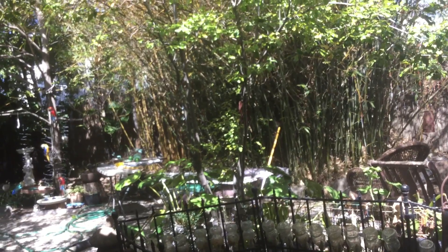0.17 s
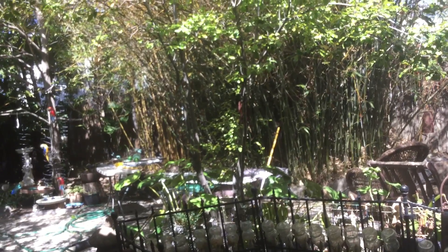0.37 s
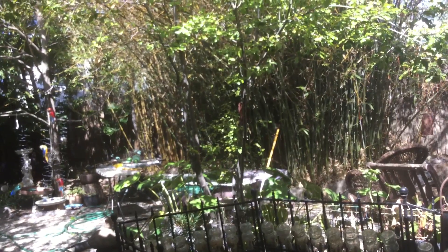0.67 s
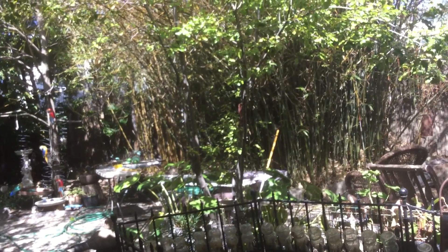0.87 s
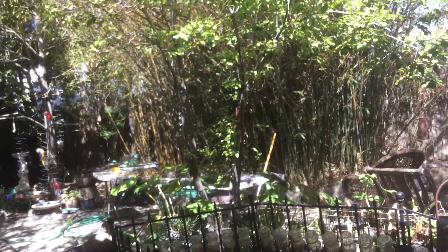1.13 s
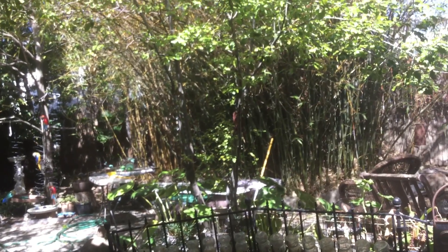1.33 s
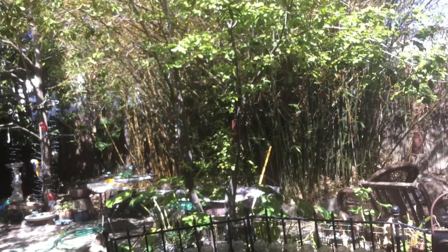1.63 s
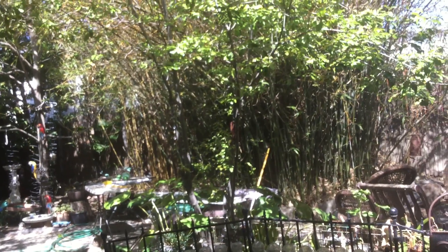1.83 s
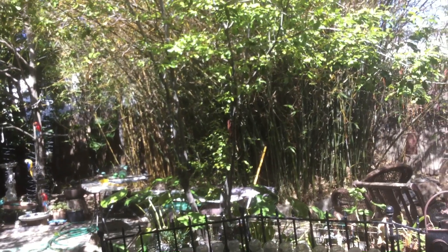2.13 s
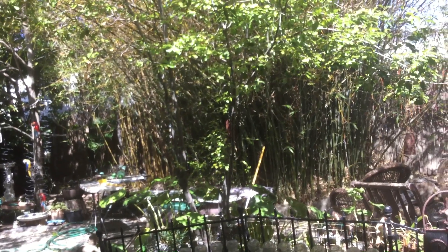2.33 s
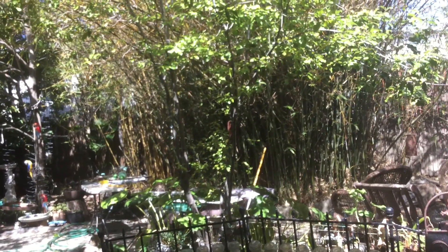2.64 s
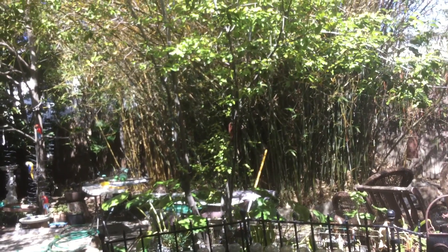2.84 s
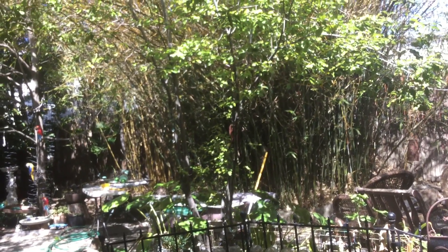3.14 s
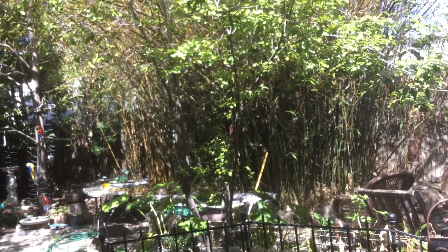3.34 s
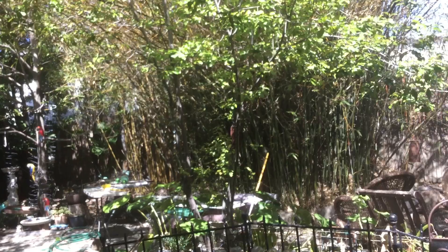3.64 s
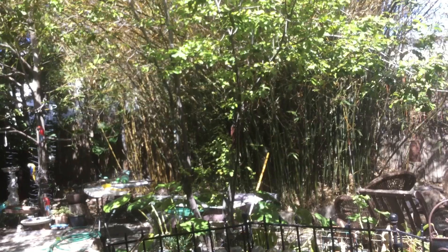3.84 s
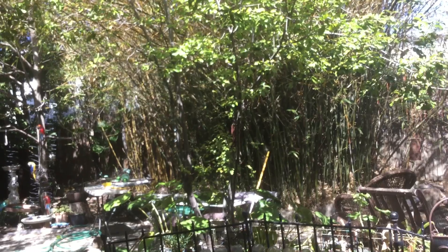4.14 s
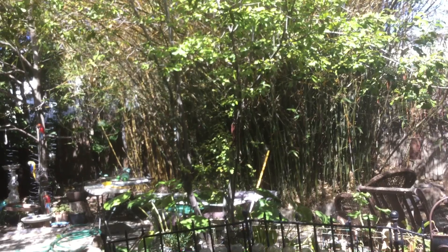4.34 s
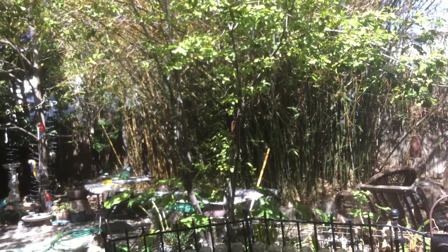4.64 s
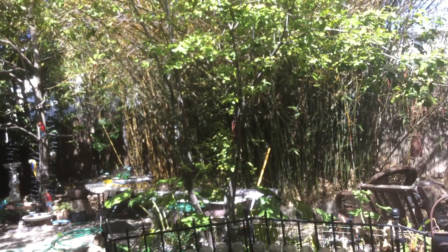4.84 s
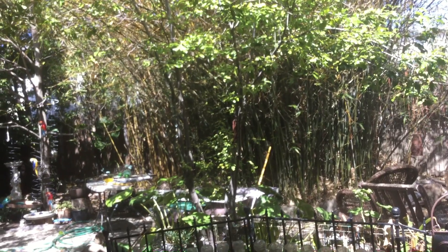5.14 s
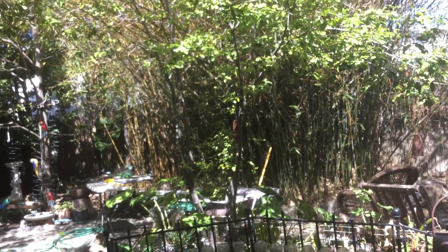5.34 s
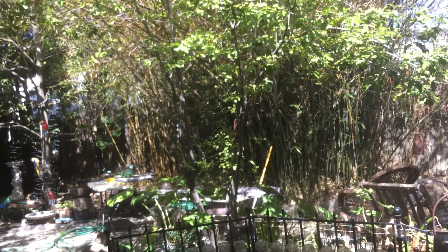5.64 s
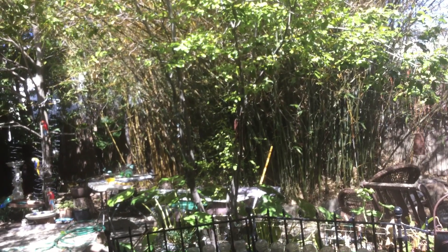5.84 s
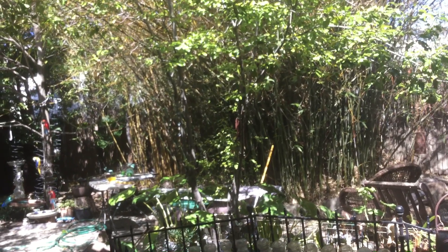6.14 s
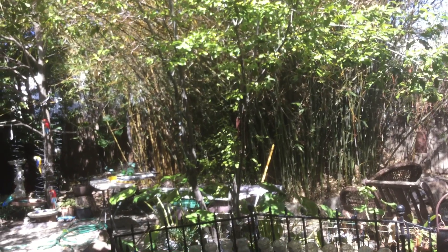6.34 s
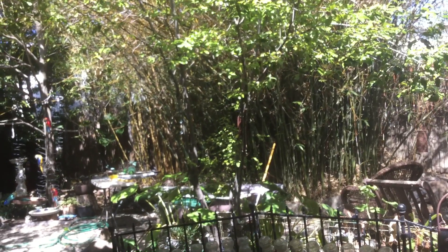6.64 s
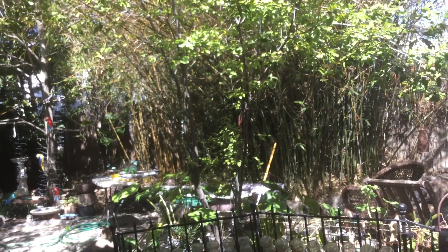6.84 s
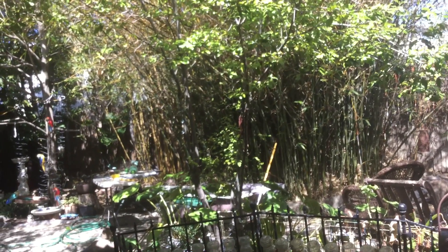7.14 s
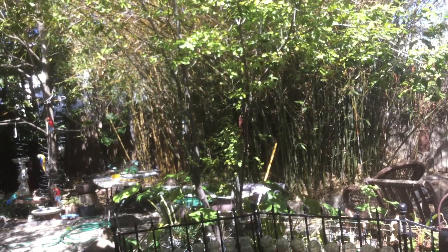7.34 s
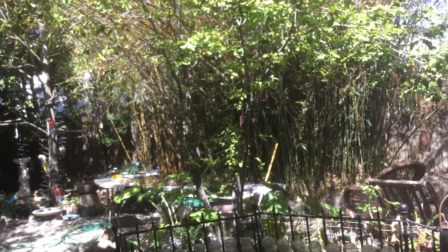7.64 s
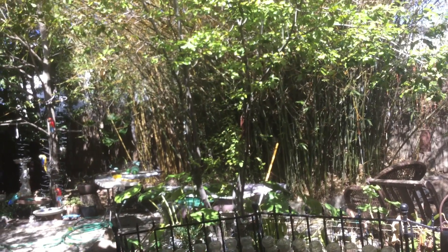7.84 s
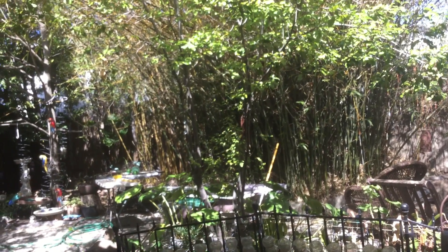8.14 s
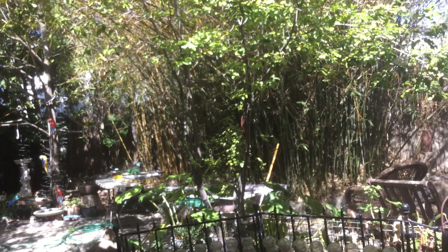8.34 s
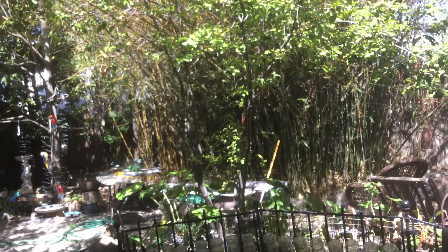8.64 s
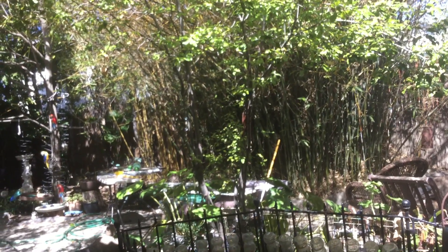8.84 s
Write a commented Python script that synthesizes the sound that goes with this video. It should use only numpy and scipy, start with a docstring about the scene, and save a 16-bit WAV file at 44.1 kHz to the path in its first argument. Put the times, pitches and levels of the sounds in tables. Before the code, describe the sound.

Several sparrows sing over each other in a garden thicket. A near bird gives clear whistles, downward slurs and even insect-like buzzes, strongest around 1.5 to 3 seconds and again from 7 to 8.5. Sharp chips, chirrups and loose warbles fill the gaps, while farther birds blur into short echoes. Very faint dove coos sit beneath early on, with soft traffic rumble and light hiss. One fixed outdoor microphone.

```python
"""Sparrows in a garden thicket

Several sparrows sing over each other: whistles and slurs are near-sines gliding along pitch
curves, buzzes and warbles are trains of pitch sweeps, with short chips between them.
Sparse echoes off fences and stems blur the farther birds. Underneath lie distant chatter,
a faint dove of pure coos, and shaped noise for far traffic rumble, hum and microphone hiss."""
import sys
import numpy as np
from scipy import signal
from scipy.fft import rfft, irfft
from scipy.io import wavfile
from scipy.ndimage import uniform_filter1d

SR = 44100
rng = np.random.default_rng(int(sys.argv[2]) if len(sys.argv) > 2 else 0)


def natural_amplitude(level_db):
    """Convert a level in decibels to a linear amplitude factor, elementwise."""
    exponent = np.asarray(level_db, float) / 20
    return 10 ** exponent


def unload_wav(signal):
    """Save mono or channel-first audio to the path in sys.argv[1] as 16-bit WAV at rate SR, clipped to [-1, 1]."""
    wavfile.write(
        sys.argv[1],
        SR,
        np.round(np.clip(np.atleast_2d(signal).T, -1, 1) * 32767).astype(np.int16),
    )


N = 396900


def evened(x):
    """Scales to rms 1."""
    return x / np.sqrt(np.mean(x ** 2) + 1e-20)


def drift(count, size):
    """Smooth random wander of rms about 1; size in samples."""
    once = uniform_filter1d(rng.standard_normal(count), size)
    return uniform_filter1d(once, size) * np.sqrt(1.5 * size)


def curve(rows):
    """A level curve in dB as gain over the whole scene."""
    return natural_amplitude(np.interp(np.arange(N) / SR, *np.transpose(rows), left=-150, right=-150))


def add(mix, start_s, sound, echo_share):
    """Splits a sound's power between the direct path (row 0) and the echo send (row 1)."""
    echo_share = np.clip(echo_share, 0, 1)
    part = mix[:, round(start_s * SR):][:, :len(sound)]
    part += np.sqrt([[1 - echo_share], [echo_share]]) * sound[:part.shape[1]]


def unroll(rows):
    """Pitch and gain of a note sample by sample, pitch corners rounded, ends faded."""
    s, hz, db = np.transpose(rows)
    t = np.arange(s[0], s[-1], 1 / SR)
    fade = np.clip(np.minimum(t - s[0], s[-1] - t) / .008, 0, 1)
    pitch_hz = uniform_filter1d(np.interp(t, s, hz), size=250, mode="nearest")
    return pitch_hz, natural_amplitude(np.interp(t, s, db)) * fade


def syrinx(hz, overtones_db=(-45,)):
    """A sine of rms 1 that follows hz, plus overtones at the given levels."""
    phase = 2 * np.pi * (np.cumsum(hz) / SR + rng.random())
    partials = (natural_amplitude(db) * np.sin(k * phase) for k, db in enumerate((0, *overtones_db), 1))
    return np.sqrt(2) * sum(partials)


def whistle(rows, far):
    """A steady membrane; breath and stirring leaves make it tremble, more so from afar."""
    hz, gain = unroll(rows)
    tremble = natural_amplitude(4.9 * far * drift(len(hz), size=250))
    waver = 1 + 0.013 * far * drift(len(hz), size=300)
    return gain * tremble * syrinx(hz * waver)


def buzz(sweeps_per_s, span_hz, rows):
    """A train of sweeps that linger, then slide up or down; fast ones tick evenly, slow ones wander."""
    hz, gain = unroll(rows)
    n = len(hz)
    loose = np.clip(40 / sweeps_per_s, 0, 1) ** 2
    rate = sweeps_per_s * (1 + (.035 + .3 * loose) * drift(n, size=900))
    turns = np.cumsum(rate) / SR + rng.random()
    sweep = turns % 1
    puff = np.sin(np.pi * sweep ** .8) ** 1.1  # loudest while the pitch lingers
    if 160 < sweeps_per_s < 400:
        puff *= 1 + .35 * np.sin(np.pi * turns)  # strong-weak pairs
    puff *= natural_amplitude((1.5 + 2 * loose) * drift(n, size=150))
    puff *= np.minimum(np.arange(n) / (.02 * SR), 1)
    glide = uniform_filter1d(np.sin(np.pi / 2 * sweep ** 1.5) ** 2, size=50, mode="nearest")
    slide = (1.05 - .3 * loose) * (glide - .38)
    wander = .035 * drift(n, size=120)
    wander += loose * (.2 * drift(n, size=500) + .08 * drift(n, size=70))
    return gain * evened(puff) * syrinx(hz + span_hz * (slide + wander))


def echo_share(db):
    """Fainter birds are farther and reach the ear mostly as echo."""
    near_db, share_per_db = -38, 0.036
    return np.clip(share_per_db * (near_db - db), .03, 1)


# Traffic and hiss spectrum. Each row: frequency in Hz, relative density in dB.
AIR_SPECTRUM = [(21, -53), (35, -13.5), (97, 0), (174, -11), (283, -13), (496, -25.5), (691, -23.5),
                (2180, -32.5), (4790, -35), (6190, -35.5), (7210, -30), (10000, -45.5), (14000, -42.5),
                (15500, -45.5)]
# Far engines. Each row: centre in Hz, width in Hz, level in dB.
ENGINE_DRONES = [(58.03, 1.1, -61), (80.8, 13.3, -59.5), (109.1, 12.3, -58.5)]


def air():
    """Steady noise shaped by its spectrum, swelling a little, plus narrow engine drones."""
    level_db = -57.5
    hz = np.fft.rfftfreq(N, 1 / SR)
    f, db = np.transpose(AIR_SPECTRUM)
    shape = natural_amplitude(np.interp(np.log(hz + 1), np.log(f + 1), db))
    wash = irfft(rfft(rng.standard_normal(N)) * shape, N)
    swell_db = .5 * drift(N, size=8000) + 1.05 * drift(N, size=2500)
    out = natural_amplitude(level_db + swell_db) * evened(wash)
    for centre_hz, width_hz, db in ENGINE_DRONES:
        peak = 1 / (1 + (2 * (hz - centre_hz) / width_hz) ** 2)
        out += natural_amplitude(db) * evened(irfft(rfft(rng.standard_normal(N)) * peak, N))
    return out


# Each row: start in seconds, level in dB.
DOVE_COOS = [(0, -66.5), (.36, -69.5), (.9, -69.5), (1.182, -78), (1.55, -74), (2.14, -66.5),
             (2.441, -68.5), (2.72, -69), (3.0, -67.5), (3.36, -72.5), (3.62, -73)]


def dove():
    """Soft pure coos far away: one wavering sine that rises quickly and dies away at each coo."""
    pitch_hz, rise_s, fade_db_per_s = 420, 0.021, -58.5
    t = np.arange(N) / SR
    gain = np.zeros(N)
    for s, db in DOVE_COOS:
        rise = np.clip((t - s) / rise_s, 0, 1)
        gain += rise * natural_amplitude(db + fade_db_per_s * np.maximum(t - s, 0))
    return gain * syrinx(pitch_hz * (1 + 0.00417 * drift(N, size=4000)), ())


# Each row: time in seconds, level in dB.
WING_FLUTTER = [(8.58, -84), (8.68, -58.5), (8.78, -58.5), (8.87, -75), (9, -58)]


def flutter():
    """Wing beats rustle the leaves: bright noise in quick lumps."""
    band = signal.butter(3, [3000, 8500], "band", fs=SR, output="sos")
    rustle = signal.sosfilt(band, rng.standard_normal(N))
    return curve(WING_FLUTTER) * evened(rustle * natural_amplitude(2 * drift(N, size=500)))


# Far flock. Each row: time in seconds, relative level in dB.
FLOCK_LEVEL = [(0, -100), (.4, -86), (1.4, -64.5), (2, -78), (2.3, -62.5), (2.8, -76), (3.4, -60.5),
               (4.2, -66.5), (4.7, -90), (5, -80), (5.5, -71.5), (6, -61), (6.24, -70), (6.4, -60),
               (7.2, -62), (7.7, -70.5), (8.3, -66), (8.5, -84), (8.75, -62), (9, -68)]


def chatter():
    """Many far birds: quick random falling slurs, sent only to the echo."""
    send = np.zeros((2, N))
    for when, pitch, slide, length, faint in rng.random((2500, 5)):
        hz, db = 3000 + 2900 * pitch, -6 * faint
        rows = [(0, hz, db), (.025 + .03 * length, hz * (.72 + 0.27 * slide), db)]
        add(send, when * N / SR, whistle(rows, 0.75), 1)
    return curve(FLOCK_LEVEL) * evened(send)


# Each row: start in seconds, level in dB, length in seconds, first pitch in Hz, last pitch in Hz.
NASAL_CALLS = [(1.506, -63, 0.041, 2780, 2260), (4.284, -57.5, 0.038, 2790, 2074),
               (4.347, -66.5, 0.036, 1730, 1350), (5.004, -57.5, 0.037, 2570, 2436),
               (5.263, -56.5, 0.037, 2640, 2100), (6.071, -63, 0.055, 2550, 1905),
               (6.14, -66, 0.0364, 2510, 1990), (6.717, -57.5, 0.032, 2780, 2020),
               (8.208, -60.5, 0.052, 2500, 2015), (8.665, -62, 0.032, 2750, 1930)]


def chucks():
    """Nasal falling calls: low rough slides rich in overtones."""
    for s, db, length, from_hz, to_hz in NASAL_CALLS:
        u = np.arange(0, 1, 1 / (length * SR))
        hz = (from_hz + (to_hz - from_hz) * u) * (1 + 0.045 * drift(len(u), size=60))
        yield s, natural_amplitude(db) * np.sin(np.pi * u) * syrinx(hz, (-6, -14)), .7


# Each row: start in seconds, level in dB, length in seconds, centre in Hz, pitch range in Hz.
THIN_CHIPS = [(0.037, -53.5, 0.018, 8820, 700), (1.035, -37.5, 0.011, 8310, 1230),
              (1.373, -61, 0.017, 8480, 400), (2.946, -69, 0.035, 8440, 596),
              (4.001, -64, 0.017, 8340, 1480), (4.983, -42, 0.0097, 8540, 590),
              (5.453, -43.5, 0.01, 8610, 1050), (5.932, -63, 0.016, 8440, 604)]


def tsips():
    """Thin high chips shaken rapidly across their range."""
    for s, db, length, hz, span_hz in THIN_CHIPS:
        t = np.arange(0, length, 1 / SR)
        shake = np.sin(2 * np.pi * (110 * t + rng.random()))
        window = signal.windows.tukey(len(t), .8)
        yield s, natural_amplitude(db) * window * syrinx(hz + .5 * span_hz * shake, ()), .7


# Each row: start in seconds, level in dB, length in seconds, foot in Hz, top in Hz.
ALARM_CHIPS = [(0.625, -43.5, 0.03, 3860, 5630), (2.051, -43, 0.027, 3890, 5650),
               (3.518, -43.5, 0.024, 4180, 5650), (5.198, -48, 0.047, 3640, 5464),
               (6.487, -45, 0.044, 4120, 5730)]


def chips():
    """Arched alarm chips: the pitch snaps up, sags a little, snaps down."""
    for s, db, length, foot_hz, top_hz in ALARM_CHIPS:
        u = np.arange(0, 1, 1 / (length * SR))
        arch = np.interp(u, [0, .22, .45, .8, 1], [0, 0.94, 0.99, 0.61, 0])
        hz = foot_hz + (top_hz - foot_hz) * uniform_filter1d(arch, size=90, mode="nearest")
        yield s, natural_amplitude(db) * signal.windows.tukey(len(u), .35) * syrinx(hz, (-24,)), .6


# Shape shared by one kind of bird. Each row: time in seconds, pitch in Hz, relative level in dB.
CHIRRUP_SHAPE = [(0, 3762, 15), (0.009, 4907, -9), (.022, 3995, 0.5), (.045, 3134, -16), (0.064, 3502, -5),
                 (.09, 3143, -8.5), (.125, 3255, -24)]
# Each row: start in seconds, level in dB, pitch factor.
CHIRRUP_CALLS = [(1.368, -41, 1.01), (2.957, -44.5, 0.96), (4.0, -39.5, 0.98), (5.93, -41.5, 1.01),
                 (7.393, -43, 0.96)]


def chirrups():
    """One pitch contour whistled again and again, transposed a little."""
    for s, db, factor in CHIRRUP_CALLS:
        yield s, natural_amplitude(db) * whistle(np.array(CHIRRUP_SHAPE) * [1, factor, 1], 0.56), .65


# Each row: start in seconds, length in seconds, first level in dB, first pitch in Hz, last pitch in Hz.
QUICK_SLIDES = [(.327, 0.12, -58, 4070, 3300), (4.121, 0.072, -57.5, 5220, 4930),
                (.74, 0.04, -56, 3340, 3100), (.51, .075, -55, 4300, 3900), (.575, .045, -58, 3000, 3300),
                (.68, .025, -56, 4150, 3900), (4.79, .06, -63, 3300, 2700), (4.9, .05, -64, 3150, 2750),
                (5.035, .03, -59, 2500, 3150), (4.235, .06, -59, 3150, 3400), (3.97, .03, -57, 5100, 4400),
                (4.285, .025, -59, 4200, 4900), (5.655, .03, -53, 3950, 3500),
                (5.68, .035, -58, 3200, 2900), (6.545, .045, -54, 4200, 3000),
                (6.575, .08, -60, 2600, 2300), (4.745, 0.035, -62, 4500, 3400),
                (4.863, 0.03, -53.5, 5880, 7600), (4.82, 0.1, -61, 4500, 4150),
                (5.745, 0.039, -50, 5280, 4250), (7.14, 0.085, -56.5, 3120, 2390),
                (7.684, 0.035, -54.5, 3780, 3090), (7.815, .045, -58, 3800, 2450),
                (7.9, .03, -59, 2850, 3320), (8.1, 0.05, -54, 4120, 2640), (8.19, 0.037, -54, 4250, 3500),
                (8.225, 0.059, -60.5, 3520, 3170), (8.275, 0.035, -62, 2970, 2710),
                (3.01, 0.048, -46, 3450, 3264), (3.07, .04, -46, 3650, 3300),
                (3.11, 0.048, -54.5, 3100, 2710), (3.85, 0.093, -65, 3360, 4350),
                (5.825, 0.035, -60, 3500, 2930), (5.905, 0.052, -51, 3620, 3150),
                (5.94, 0.052, -45, 4230, 3950), (5.985, 0.065, -46.5, 3660, 3170),
                (6.04, 0.038, -52, 3300, 2513), (6.01, 0.046, -54, 4700, 4330),
                (8.44, 0.043, -64, 5340, 3920), (8.63, 0.079, -61, 4400, 5000),
                (8.74, 0.042, -50, 4420, 3780), (8.785, 0.048, -49, 3600, 3200),
                (.755, 0.057, -62, 4250, 3700), (4.19, 0.039, -61, 5200, 5950),
                (8.915, 0.04, -66, 5030, 4250)]


def slides():
    """Quick slides, mostly falling, that fade as they go."""
    fade_db = -2.5
    for s, length, db, from_hz, to_hz in QUICK_SLIDES:
        far = echo_share(db)
        yield s, whistle([(0, from_hz, db), (length, to_hz, db + fade_db)], far), far


# Each row: start in seconds, length in seconds, first level in dB, level before letting go in dB,
# first pitch in Hz, echo share 0-1.
HELD_NOTES = [(0, 0.17, -53.5, -57, 3510, 0.63), (0.41, 0.15, -58, -60, 3330, 0.3),
              (.635, .1, -61, -60, 3330, .3), (.44, .045, -57, -58, 4180, .5),
              (0.631, 0.066, -51, -56, 4064, 0.53), (2.444, 0.089, -74, -59.5, 5005, .4),
              (2.503, .43, -71, -73, 3980, 0.84), (3.17, 0.23, -57.5, -60, 3230, 0.66),
              (3.655, 0.17, -56, -60.5, 3640, 0.38), (3.69, 0.26, -70, -61, 4920, .5),
              (4.95, 0.15, -50, -77, 4135, 1), (4.979, 0.376, -60, -57, 3400, 0.38),
              (5.33, 0.24, -62, -57, 3140, 0.64), (5.358, 0.31, -66, -58, 3426, 0.85),
              (5.775, 0.18, -47.5, -52, 4220, 0.47), (8.85, 0.061, -51, -57, 3610, 0.48),
              (8.845, 0.027, -59, -60, 4210, 0.44), (8.9, 0.055, -65, -69, 5560, 0.46),
              (6.17, .12, -47, -55, 4300, 0.4), (4.955, .09, -68, -66, 2520, .6),
              (4.855, .06, -62, -63, 3300, .4), (4.2, .06, -59, -61, 3720, .5),
              (4.315, .03, -56, -56, 3570, .3), (4.065, .035, -53, -53, 4020, .6),
              (6.645, .09, -54, -57, 3250, .4), (4.89, 0.062, -57, -60, 7300, .7),
              (4.87, .08, -62, -60, 7750, .7), (4.92, .04, -62, -62, 8250, .6),
              (7.93, 0.085, -61, -66, 3355, 0.62), (8.04, .03, -61, -60, 3680, .6)]


def held_whistles():
    """Held whistles sag in pitch, swell or fade, then let go."""
    sag_per_s, hold_share, release_db = .07, 0.87, -10
    for s, length, from_db, to_db, hz, far in HELD_NOTES:
        t = length * np.array([0, hold_share, 1])
        rows = np.transpose([t, hz * (1 - sag_per_s * t), [from_db, to_db, to_db + release_db]])
        yield s, whistle(rows, far), far


# Each row: start in seconds, length in seconds, first level in dB, last level in dB,
# first pitch in Hz, last pitch in Hz.
LOOSE_WARBLES = [(0.029, 0.11, -57.5, -64, 3520, 3156), (.407, 0.27, -63, -63, 4250, 4100),
                 (0.705, 0.06, -50, -53, 3850, 3750), (1.465, 0.15, -46.5, -55, 3330, 3070),
                 (2.142, 0.057, -39, -65, 3680, 3540), (3.02, 0.1, -54, -55, 3100, 3010),
                 (3.595, 0.063, -47, -58, 3950, 3850), (3.223, 0.52, -62, -68, 4720, 4140),
                 (3.8, 0.13, -79, -60, 4200, 4290), (4.121, 0.1, -59, -63, 3415, 3470),
                 (5.276, 0.15, -46, -69, 3530, 3280), (5.668, 0.061, -63, -60, 4490, 3950),
                 (5.718, 0.1, -60, -67, 3140, 3320), (5.94, 0.086, -55, -60, 5200, 5040),
                 (6.297, 0.21, -63, -55, 3880, 3930), (6.546, 0.16, -47, -53.5, 3776, 3137),
                 (6.85, 0.18, -63, -56, 4400, 3850), (8.433, 0.061, -66, -56, 4920, 4350),
                 (8.679, 0.094, -53, -57, 4700, 4030), (8.7, 0.25, -57, -56, 3500, 3100),
                 (8.8, .17, -59, -58, 2900, 2800)]


def warbles():
    """Loose warbles: slow uneven trains of falling chirps, their range a share of the pitch."""
    chirps_per_s, range_share, extra_echo = 30, -.31, 0.3
    for s, length, from_db, to_db, from_hz, to_hz in LOOSE_WARBLES:
        rows = [(0, from_hz, from_db), (length, to_hz, to_db)]
        far = echo_share((from_db + to_db) / 2) + extra_echo
        yield s, buzz(chirps_per_s, range_share * from_hz, rows), far


# Each row: start in seconds, length in seconds, first level in dB, centre in Hz.
HIGH_RASPS = [(3.951, 0.11, -57.5, 6090), (4.3, 0.1, -59, 6260), (4.96, 0.13, -63, 6400),
              (5.229, 0.084, -54, 6600), (6.55, 0.071, -62, 6980), (6.965, 0.037, -45.5, 6020)]


def rasps():
    """Short high rasps: fast sweep trains that die at once."""
    sweeps_per_s, span_hz, fade_db = 209, 800, -15
    for s, length, db, hz in HIGH_RASPS:
        rows = [(0, hz, db), (length, hz, db + fade_db)]
        yield s, buzz(sweeps_per_s, span_hz, rows), echo_share(db)


# Kinds of buzz. Each holds: sweeps per second, nominal sweep range as share of pitch (minus falls),
# climb per second as share of pitch, onset in seconds, onset level in dB.
BUZZ_KIND = (204, .29, .12, .035, -3)
TRILL_KIND = (131, -.19, -.05, .025, -2)
LOW_BUZZ_KIND = (213, .3, -.02, .1, -12)
SHRILL_KIND = (710, .3, .2, .02, -6)  # shaken so fast that it splits into lines
# Each row: start in seconds, length in seconds, mid level in dB, centre in Hz, swell in dB, echo share 0-1.
HIGH_BUZZES = [(0.795, 0.29, -54.5, 5200, 0, 0.4), (1.625, 0.24, -52, 5000, 5, 0.5),
               (2.038, 0.17, -59, 5050, 17, 0.34), (2.532, 0.31, -46.5, 4900, 2, 0.3),
               (4.417, 0.25, -63.5, 4920, -10, 0.7), (4.744, 0.31, -60, 4997, 6, 0.36),
               (6.122, .26, -48, 5210, 3, .45), (7.593, 0.073, -54, 4680, 1, 0.93),
               (7.753, 0.3, -44, 4822, 3.5, 0.12)]
TRILL_NOTES = [(2.896, 0.3, -44.5, 4850, -1, 0.2), (6.491, 0.3, -51, 4950, 2, 0.23),
               (8.088, .326, -43.5, 4880, 0.5, 0.3)]
LOW_BUZZ_NOTES = [(3.25, 0.62, -56, 2906, -10.5, 0.38), (8.485, .3, -55, 2880, 2, 0.35)]
SHRILL_NOTES = [(8.72, 0.098, -52, 7150, -4, .5)]


def buzzes():
    """Even buzzes of the song: sweep trains that start soft, swell or fade and stop short."""
    wobble_hz = 35  # random wander of the centre
    kinds = ((BUZZ_KIND, HIGH_BUZZES), (TRILL_KIND, TRILL_NOTES),
             (LOW_BUZZ_KIND, LOW_BUZZ_NOTES), (SHRILL_KIND, SHRILL_NOTES))
    for (sweeps_per_s, share, climb, onset_s, onset_db), notes in kinds:
        for s, length, db, hz, swell_db, far in notes:
            t = np.linspace(0, length, 12)
            levels = db + swell_db * (t / length - .5) + onset_db * np.clip(1 - t / onset_s, 0, 1)
            pitch = hz * (1 + climb * (t - length / 2)) + wobble_hz * rng.standard_normal(len(t))
            yield s, buzz(sweeps_per_s, share * hz, np.transpose([t, pitch, levels])), far


# Syllable shapes. Each row: time in seconds, pitch in Hz, relative level in dB.
ARCH_SHAPE = [(0, 3420, -25), (.038, 3798, -4.5), (.075, 3917, 1), (.105, 3930, 5), (.13, 3733, -3),
              (.165, 3115, -7)]
SLUR_SHAPE = [(0, 5975, -11.5), (.032, 5090, -6.5), (.05, 4316, -0.5), (.075, 4042, -3.5),
              (.125, 4042, -11), (.205, 3999, 0.5), (.24, 3944, -4.5), (.258, 3730, -17.5)]
RISE_SHAPE = [(0, 6610, 1), (.035, 7020, -12.5), (.06, 7750, 1.5), (.09, 8980, -18)]
# Each row: start in seconds, level in dB, pitch factor, echo share 0-1.
ARCH_TIMES = [(.896, -51.5, 0.99, 0.4), (2.009, -37.5, 1, 0.052), (5.535, -51.5, 1.0, 0.52),
              (7.231, -38.5, 1.003, 0.23)]
SLUR_TIMES = [(1.097, -44, 1, 0.22), (2.215, -41, 1.0, 0.24), (7.437, -37, 1.0, 0.22)]
RISE_TIMES = [(6.097, -48, 1, 0.26), (7.306, -53, .96, 0.3), (7.694, -67, 1.04, 0.82)]


def syllables():
    """Song syllables: three fixed pitch contours, whistled at varied pitch and level."""
    kinds = ((ARCH_SHAPE, ARCH_TIMES), (SLUR_SHAPE, SLUR_TIMES), (RISE_SHAPE, RISE_TIMES))
    for shape, times in kinds:
        for s, db, factor, far in times:
            yield s, whistle(np.array(shape) * [1, factor, 1] + [0, 0, db], far), far


# One list per whistle. Each row: time in seconds, pitch in Hz, level in dB.
OPENING_WHISTLES = [
    [(1.47, 3380, -56), (1.48, 3297, -48.5), (1.516, 3300, -46.5), (1.576, 3360, -69), (1.6, 3317, -52.5),
     (1.872, 3206, -54), (1.896, 3160, -40.5), (1.98, 3056, -74)],
    [(6.75, 3280, -67), (6.784, 3240, -55), (6.944, 3263, -50.5), (6.972, 3250, -59), (6.998, 3270, -45),
     (7.078, 3264, -40.5), (7.206, 3152, -52), (7.21, 3159, -60)],
]


def openings():
    """Long opening whistles of the nearest singer."""
    far = 0.25
    for rows in OPENING_WHISTLES:
        yield rows[0][0], whistle(rows, far), far


def thicket(x):
    """Sparse echoes off stems, fences and walls, energy 1."""
    t60_s, gather_s = 0.23, 0.0037
    at = np.arange(100, SR // 2, 22)
    taps = np.zeros(SR // 2 + 22)
    signs = rng.choice([-1., 1.], len(at))
    taps[at + rng.integers(0, 22, len(at))] = signs * natural_amplitude(-60 * at / SR / t60_s)
    taps *= np.minimum(np.arange(len(taps)) / (gather_s * SR), 1)  # scattered sound gathers first
    return signal.fftconvolve(x, taps / np.linalg.norm(taps))[:N]


def birds():
    """Every note goes partly direct, partly through three slowly traded echo patterns as leaves stir."""
    echo_db = 2
    mix = chatter()
    for voice in (chucks, tsips, chips, chirrups, slides, held_whistles,
                  warbles, rasps, buzzes, syllables, openings):
        for start_s, note, far in voice():
            add(mix, start_s, note, far)
    turn = np.pi * 1.3 * np.arange(N) / SR
    echo = np.zeros(N)
    for k in range(3):
        echo += thicket(mix[1] * np.sqrt(2 / 3) * np.cos(turn + k * np.pi / 3))
    return mix[0] + natural_amplitude(echo_db) * echo


def scene():
    """The garden at one microphone."""
    return (air() + dove() + flutter() + birds())[None]


def top_cut(x):
    """Nothing passes above the cut-off."""
    return signal.sosfilt(signal.butter(12, 15640, fs=SR, output="sos"), x)


def record(dry):
    """Stores the finished mix."""
    return top_cut(dry)


dry = scene()
out = record(dry)
unload_wav(out)
```